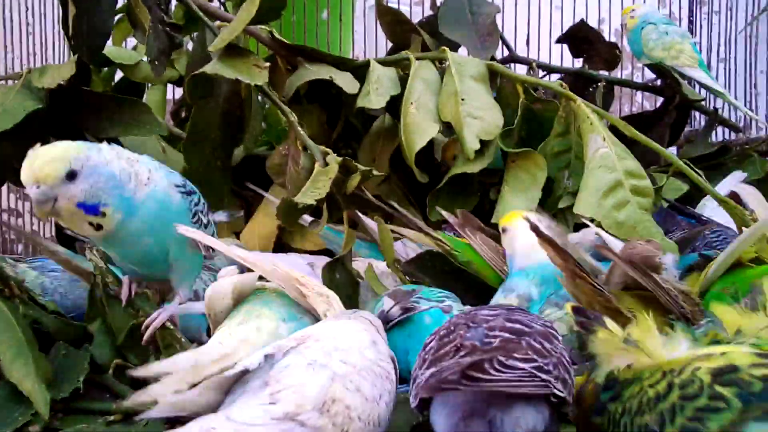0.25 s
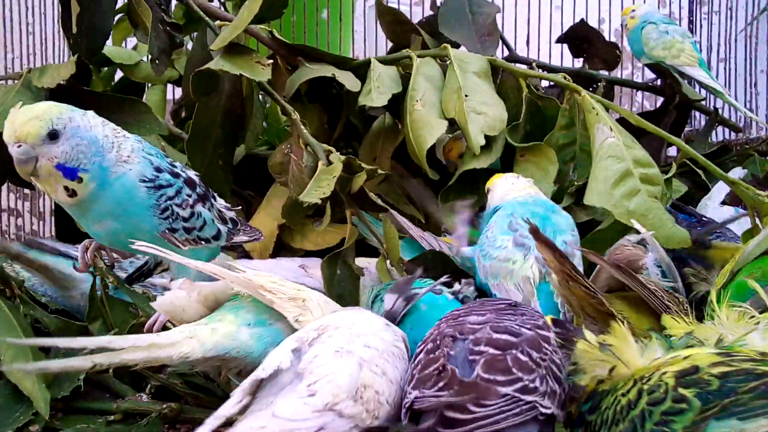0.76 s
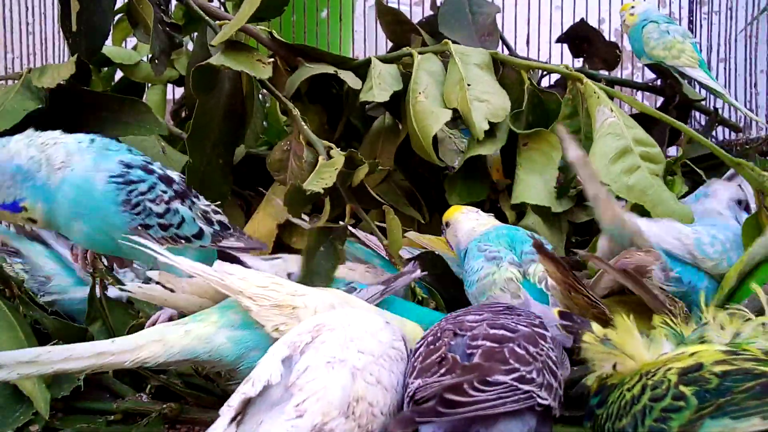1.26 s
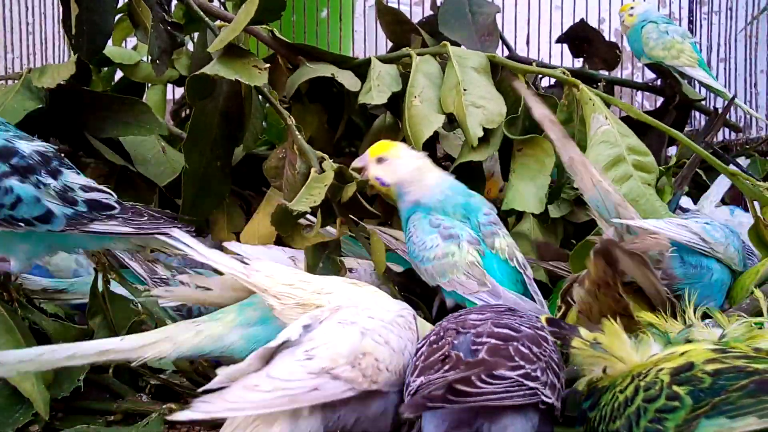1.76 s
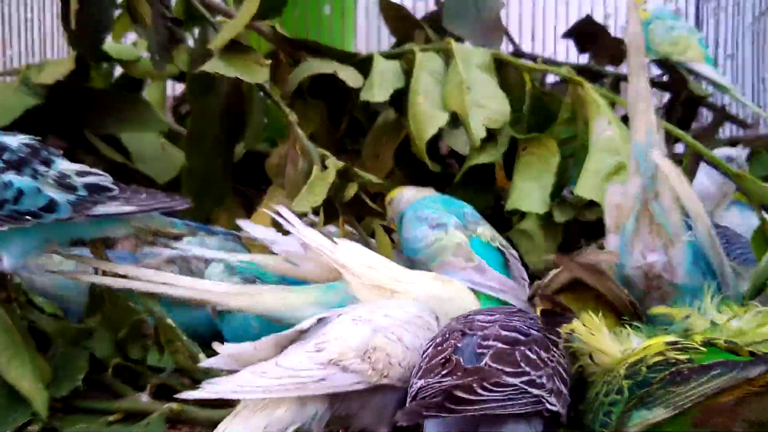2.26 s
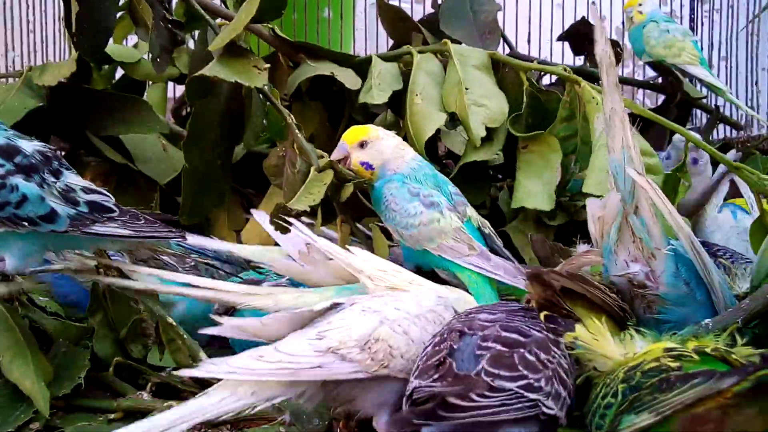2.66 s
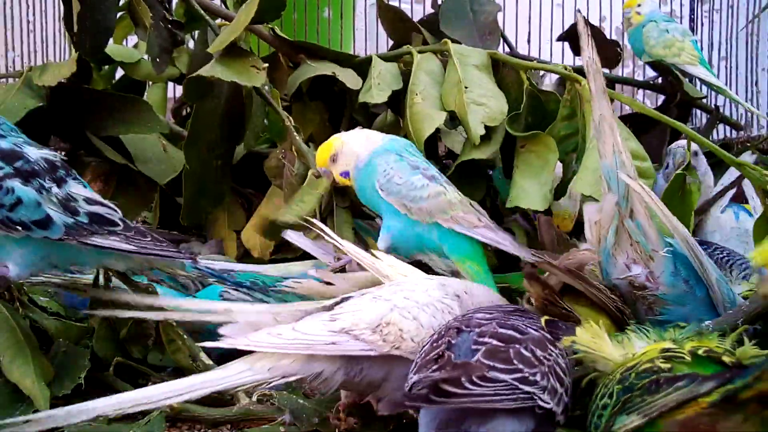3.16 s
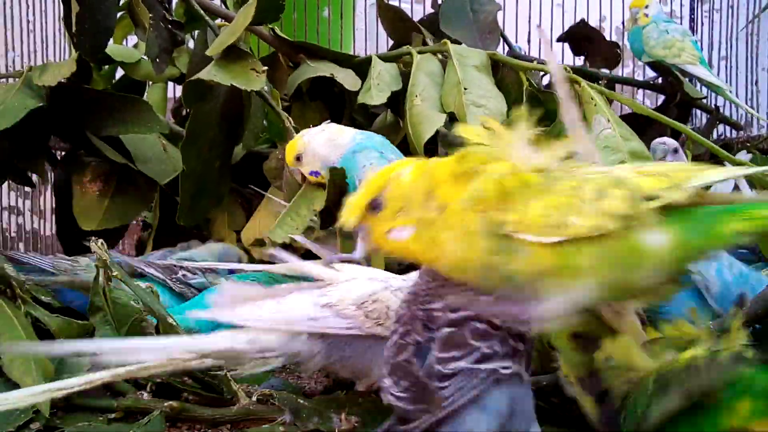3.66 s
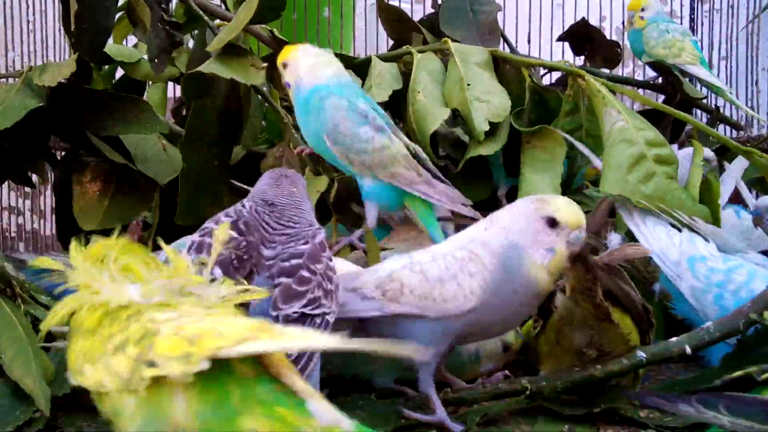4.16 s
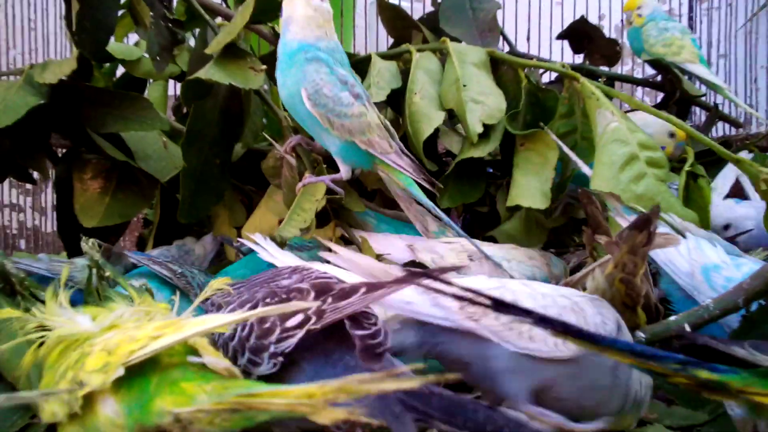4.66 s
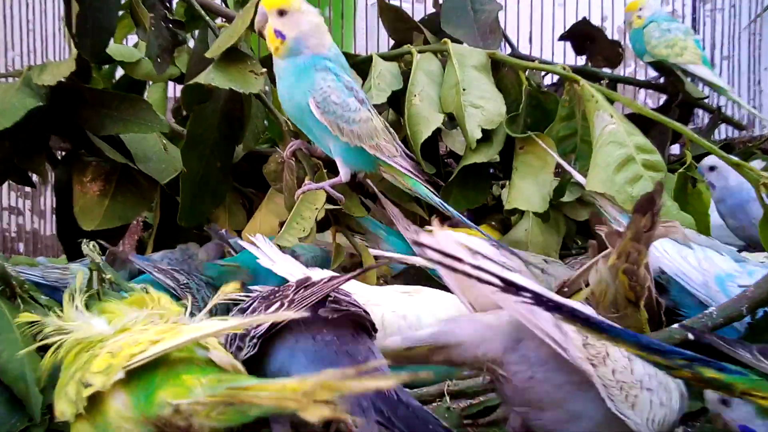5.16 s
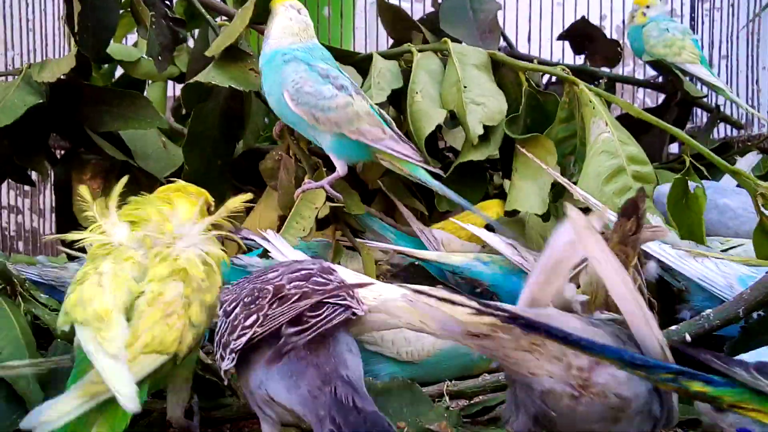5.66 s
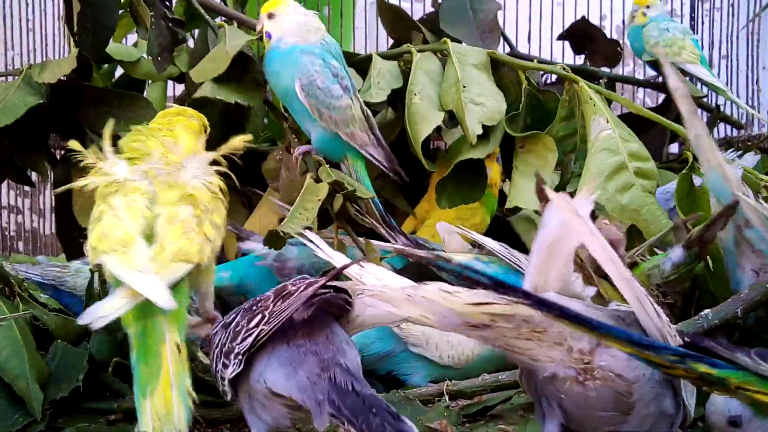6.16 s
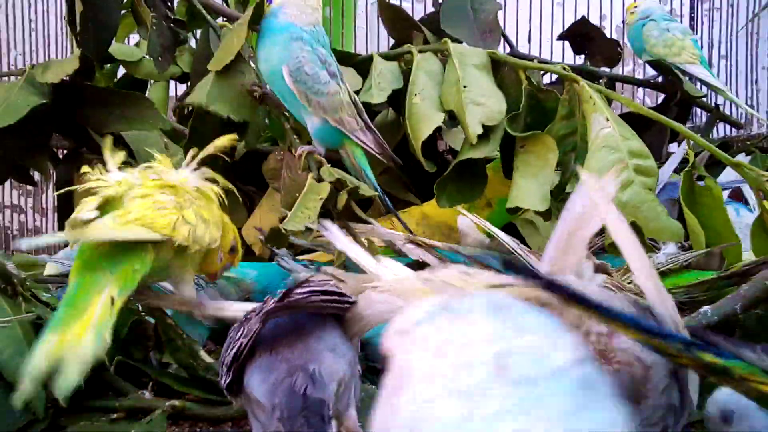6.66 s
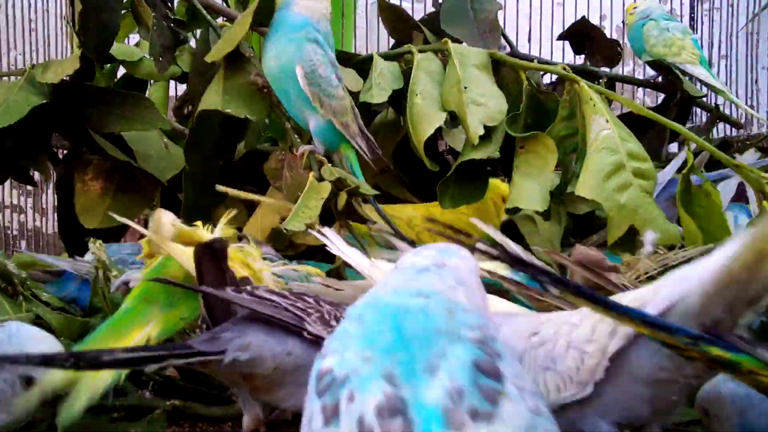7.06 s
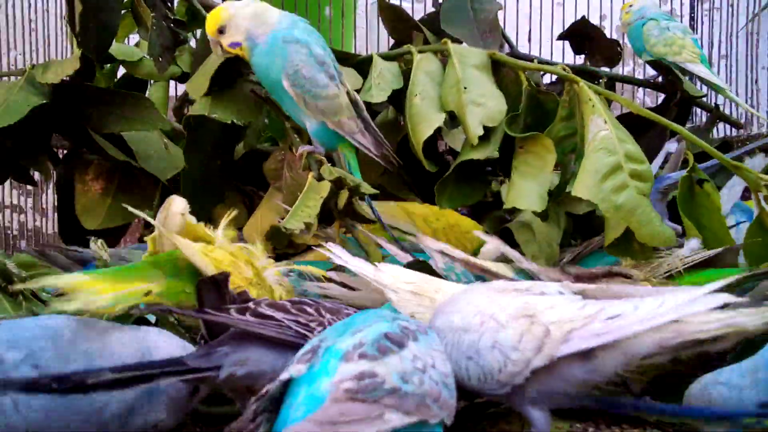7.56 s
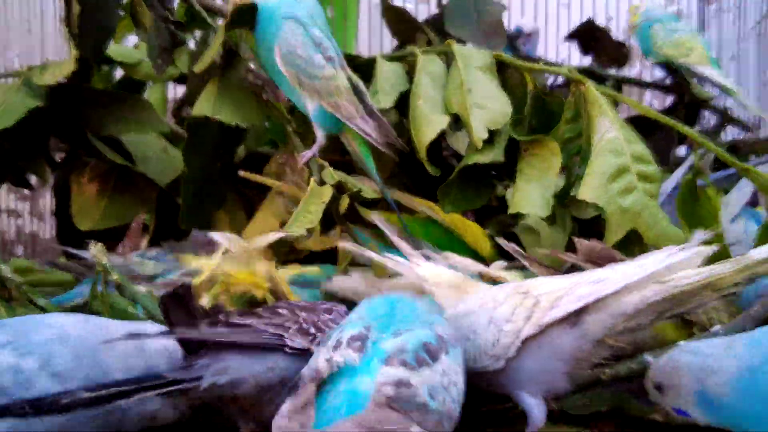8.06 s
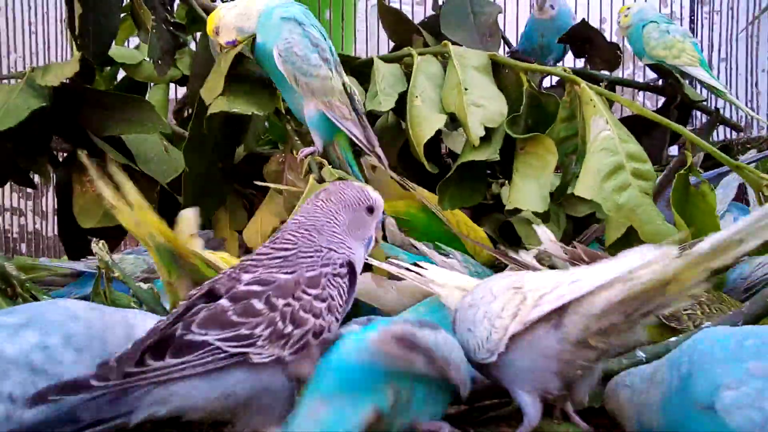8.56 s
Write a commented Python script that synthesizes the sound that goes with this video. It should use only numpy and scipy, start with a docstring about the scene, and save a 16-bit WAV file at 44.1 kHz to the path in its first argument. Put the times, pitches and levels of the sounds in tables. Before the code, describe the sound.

Budgerigars feed on leafy branches, chattering in quick bright bursts over a distant ringing flock, with dull knocks, dry rustles and a brief wing flutter.

```python
"""In an aviary, close to one microphone, a flock of budgerigars chatters while feeding on leafy branches.
Near birds chirp, warble, yip, rasp and scold over the ringing calls of birds farther off.
Voices are vibrating membranes coloured by throat and beak; scolds are shaped noise.
Beaks and feet knock on the branches as struck resonances, leaves and husks snap as bursts of noise,
a faint high crackling hiss comes and goes, and wings push air at the microphone in low swings of pressure."""
import sys
import numpy as np
from scipy import signal
from scipy.fft import rfft, irfft, next_fast_len
from scipy.io import wavfile
from scipy.ndimage import uniform_filter1d

SR = 44100
rng = np.random.default_rng(int(sys.argv[2]) if len(sys.argv) > 2 else 0)


def master_out(mix):
    """Clip the mix to full scale and print it as 16-bit PCM to the path in sys.argv[1]."""
    frames = np.transpose(np.atleast_2d(mix))
    ceiling = np.clip(frames, -1, 1)
    pcm = np.round(ceiling * 32767).astype(np.int16)
    wavfile.write(sys.argv[1], SR, pcm)


N = 389403
EDGE_HZ = 16100  # upper limit of the recorded band

# Ways to bend a note: turning point [share of the note], bend away from it [log pitch per squared share,
# negative = upward], roughness [0-1], trill depth [share of the pitch]
ARCH = (0.54, 0.817, 0.073, 0.013)
HOOP = (.46, 2.4, .08, 0)
RISE = (.75, .42, .04, 0)
SWEEP = (.85, .85, .05, 0)
CLIMB = (.12, -1.05, .05, 0)
LIFT = (0, -.47, .08, 0)
DIP = (.5, -0.913, 0.17, 0.057)
FLICK = (0, .6, .17, .03)
FALL = (0, .15, .07, 0)
LEVEL = (.5, .06, .08, 0)
BUZZ = (.45, .3, .36, .14)
# Resonances of the throat behind a wide-open beak: f/Hz, gain/dB
OPEN_BEAK = [(800, 4), (2000, 1.5), (3200, 3.5), (4300, 5), (6000, 6), (7500, 0), (9000, -34),
             (15000, -15.5)]
# Colour of the snaps and of the high crackling hiss: f/Hz, gain/dB
SNAP_COLOUR = [(900, -2.5), (4000, 1.5), (7300, 8.5), (9000, -7), (13500, -8.5), (15000, -8)]


def amp(db):
    """Decibels to gain."""
    return 10 ** (np.asarray(db) / 20)


def unit(x):
    """Scales to rms 1."""
    return x / np.sqrt(np.mean(x ** 2) + 1e-20)


def read(points, hz):
    """Reads a spectrum on a log-frequency axis."""
    f, value = np.transpose(points)
    return np.interp(np.log(hz + 1), np.log(f), value)


def colour(x, points):
    """Filters by a spectrum in dB."""
    size = next_fast_len(len(x))
    gain = amp(read(points, np.fft.rfftfreq(size, 1 / SR)))
    return irfft(rfft(x, size) * gain, size)[:len(x)]


def wander(count, rate_hz):
    """Smooth random motion of about rms 1."""
    size = next_fast_len(count + 4096)
    smoothing = np.exp(-(np.fft.rfftfreq(size, 1 / SR) / rate_hz) ** 2)
    return unit(irfft(rfft(rng.standard_normal(size)) * smoothing, size))[:count]


def ring(x, hz, width_hz):
    """A two-pole resonance."""
    return signal.lfilter(*signal.iirpeak(min(hz, SR / 2 - 1), hz / width_hz, SR), x)


def progress(length):
    """Runs from 0 to 1 over a length in seconds."""
    return np.linspace(0, 1, max(int(length * SR), 64))


def shaped(x, db, taper):
    """Fades both ends and sets the rms level."""
    return amp(db) * unit(x * signal.windows.tukey(len(x), taper))


def play(rows, source):
    """Places one sound for each row at its time."""
    mix = np.zeros(N + SR)
    for s, *rest in rows:
        sound = source(*rest)
        start = max(int(s * SR), 0)
        mix[start:start + len(sound)] += sound
    return mix[:N]


def scatter(db, spread_db, count):
    """Rows (t/s, level/dB) of small events at random moments."""
    return [(a * N / SR, db + spread_db * (2 * b - 1)) for a, b in rng.random((count, 2))]


def song(phrase, renditions):
    """Rows of notes for a learned phrase, sung faster or slower, higher or lower."""
    return [(s + start * length, share * length, bend, ratio * hz, db + accent_db)
            for s, length, hz, db in renditions
            for start, share, bend, ratio, accent_db in phrase]


def wash(db=-42, patchy_db=5.5, swell_db=1, steady_hz=220):
    """The background hiss comes and goes in patches of pitch and time, over a steadier rumble."""
    # Background noise: f/Hz, gain/dB
    air = [(20, -15), (75, 9.5), (140, -9), (230, -20), (350, -4.5), (1400, -11), (3400, -4), (4400, -7.5),
           (7200, -6.5), (9000, -31), (13500, -28.5), (15000, -24)]
    hz, _, z = signal.stft(colour(rng.standard_normal(N), air), SR, nperseg=512, noverlap=384)
    across_pitch = uniform_filter1d(rng.standard_normal(z.shape), size=14, axis=0)
    patches = unit(uniform_filter1d(across_pitch, size=26, axis=1))
    patch_gain = amp(patchy_db * patches * (hz / (hz + steady_hz))[:, None])
    hiss = signal.istft(z * patch_gain, nperseg=512, noverlap=384)[1][:N]
    return amp(db) * unit(hiss) * amp(swell_db * wander(N, 2.3))


def syrinx(hz, rough, tract, jitter=0.16, drift=.012, slope_db=0, lift_db=0, rasp_hz=900):
    """A vibrating membrane heard through the throat; when rough it jitters and doubles its period."""
    count = len(hz)
    unsteady = jitter * rough * wander(count, rasp_hz) + drift * wander(count, 240)
    phase = 2 * np.pi * np.cumsum(hz * (1 + unsteady)) / SR
    tone = 0
    for k in range(1, 5):
        harmonic_db = read(tract, k * hz) + slope_db * (k + 0.5) + lift_db * (k == 2)
        tone = tone + amp(harmonic_db) * (k * hz < EDGE_HZ) * np.sin(k * phase)
    # level by the stronger of the first two harmonics
    tone = tone / amp(np.maximum(read(tract, hz), read(tract, 2 * hz) + slope_db + lift_db))
    # alternate cycles differ in strength, which adds side tones halfway between the harmonics
    doubling = 1 + 1.34 * rough * wander(count, 127) * np.cos(phase / 2)
    flutter = np.exp(.6 * np.sqrt(abs(rough)) * np.tanh(wander(count, 300)))
    turbulence = .22 * rough * unit(colour(rng.standard_normal(count), tract))
    return (tone * doubling + turbulence) * flutter


def note(length, bend, turn_hz, db, slack_db=9, attack_s=0.0018, release_s=0.0023,
         whim=0.0228, trill_hz=140):
    """The pitch curves away from a turning point; the farther it strays, the weaker and hoarser the voice."""
    # Throat resonances: f/Hz, gain/dB
    throat = [(900, -21), (2000, 10), (3500, 15), (4600, 0.5), (6500, 5), (7800, 4.5), (9000, -69),
              (15000, -10)]
    # Low notes are richer in overtones: pitch f/Hz, lift of the second harmonic/dB
    overtones = [(1900, 7), (2500, -2)]
    u = progress(length)
    turn, curve, rough, trill = bend
    away = (u - turn) ** 2
    quiver = trill * np.sin(2 * np.pi * (trill_hz * length * u + rng.random())) + whim * wander(len(u), 74.0)
    hz = turn_hz * np.exp(quiver - curve * away)
    attack = np.minimum(u * length / attack_s, 1)
    release = np.minimum((1 - u) * length / release_s, 1)
    effort = amp(-slack_db * away)
    voice = syrinx(hz, rough * (.5 + 3 * away), throat, slope_db=-6.5, lift_db=read(overtones, hz))
    return amp(db) * unit(voice * attack * release * effort)


def among_leaves(x, count=4, strength=0.29, delay_s=.009):
    """Nearby leaves and bars return a few early echoes, so a sweeping pitch swells and fades."""
    out = np.pad(x, (0, int(delay_s * SR) + 1))
    for delay, sign in zip(rng.random(count), rng.choice([-1, 1], count)):
        start = int(delay * delay_s * SR)
        out[start:start + len(x)] += sign * strength * x
    return out


def whistle(length, bend, hz, db):
    """One note, heard through the foliage."""
    return among_leaves(note(length, bend, hz, db))


def flock(count=170, db=-54.0, spread_db=3):
    """The other birds slur short notes at random."""
    bends = [ARCH, RISE, SWEEP, DIP]
    rows = [(a * N / SR, .015 + .035 * b, bends[int(c * len(bends))], 1900 + 2000 * d,
             db + spread_db * (2 * e - 1))
            for a, b, c, d, e in rng.random((count, 5))]
    return play(rows, whistle)


def knock(db, hz=740, ring_s=0.0088, rattle=0.38):
    """A dull tap rings a branch, then a few separate ticks of twigs ring with it."""
    t = np.arange(2048) / SR
    tap = 1. * (t == 0)
    branch_hz = hz * np.exp(0.16 * rng.standard_normal())
    blow = ring(ring(tap, branch_hz, 670), hz, 2300)
    ticks = rng.standard_normal(len(t)) * (rng.random(len(t)) < 400 / SR)  # about 400 a second
    twigs = unit(ring(ring(ticks, 395, 315), hz, 2000)) * np.exp(-t / ring_s)
    band = signal.butter(3, [270, 1700], "band", fs=SR)
    return amp(db) * signal.lfilter(*band, blow / abs(blow).max() + rattle * twigs)


def scold(length, db, flutter_db=2.5, flutter_hz=220):
    """A hoarse, fluttering screech of coloured noise that swells and fades."""
    # Colour of the screech: f/Hz, gain/dB
    screech_colour = [(1200, -66), (3000, -7.5), (4600, -4.5), (6700, 5), (7500, -5), (8800, -23.5),
                      (15000, -30)]
    u = progress(length)
    flutter = amp(flutter_db * wander(len(u), flutter_hz))
    screech = colour(rng.standard_normal(len(u)), screech_colour) * flutter
    return amp(db) * unit(screech * np.sqrt(abs(np.sin(np.pi * u))))


def peeps():
    """Rows of notes for the peep: an arch, a fall and a low dip."""
    # Learned phrase: start and length [shares of the phrase], bend, pitch [ratio], accent/dB
    phrase = [(0, 0.24, ARCH, .92, 0), (.27, 0.32, FALL, 1.07, 2.5), (.62, .38, DIP, .52, -8)]
    # Each time it is sung: t/s, length/s, f/Hz, level/dB
    renditions = [(0.184, 0.083, 3380, -33), (0.255, .08, 3630, -33), (.373, 0.088, 3600, -36),
                  (.503, .078, 3450, -33), (2.272, 0.11, 3446, -34.5)]
    return song(phrase, renditions)


def draught(length, db, hz=85, width_hz=70):
    """Stirred air buffets the microphone in a low swell."""
    return shaped(ring(wander(len(progress(length)), 135), hz, width_hz), db, 0.62)


def snap(db, crack_s=0.011, crumble=0.13):
    """A dry crack with a trail of tiny fractures."""
    t = np.arange(1024) / SR
    grains = rng.standard_normal(len(t))
    fractures = crumble * grains ** 3 / 2 * np.exp(-t / 0.065)
    crack = colour(grains * np.exp(-t / crack_s) + fractures, SNAP_COLOUR)
    return 2 * amp(db) * crack / abs(crack).max()


def jostling(db=-36, spread_db=8, busiest_s=5.6, count=150):
    """Rows (t/s, level/dB) of small crackles, thickest while the birds crowd over the leaves."""
    times = rng.triangular(0, min(busiest_s, N / SR), N / SR, count)
    return list(zip(times, db + spread_db * rng.uniform(-2.0, 1, count)))


def yip(length, top_hz, db, bright_db, strain=0.23, crest_s=.019, sweep=0.97, sag_per_s=1.52):
    """The pitch shoots up over an octave, then sags; bright_db lifts or cuts the second harmonic."""
    past = progress(length) * length - crest_s
    hz = top_hz * np.exp(-np.where(past < 0, sweep * (past / crest_s) ** 2, sag_per_s * past))
    voice = syrinx(hz, strain, OPEN_BEAK, drift=strain / 10, lift_db=bright_db)
    return among_leaves(shaped(voice, db, 0.64))


def warbles():
    """Rows of notes for the warble: six quick notes leaping up and down."""
    # Learned phrase: start and length [shares of the phrase], bend, pitch [ratio], accent/dB
    phrase = [(0, .13, FLICK, 1.42, 0.5), (.18, .2, ARCH, 1.12, 2.5), (.37, 0.12, LEVEL, .9, -2.3),
              (.47, .13, DIP, 1.03, 1.4), (.59, .08, FLICK, 1.3, 0), (.68, .33, RISE, 1, 1.7)]
    # Each time it is sung: t/s, length/s, f/Hz, level/dB
    renditions = [(1.067, .13, 2860, -36.5), (2.075, .12, 2967, -29), (3.115, 0.15, 2795, -36),
                  (6.16, .13, 2820, -28), (7.2, .137, 2757, -28.5), (8.218, 0.14, 2863, -29.5)]
    return song(phrase, renditions)


def yip_runs(length=0.023, top_hz=2750, strain=0.019, bright_db=-1):
    """Birds rattle off short, relaxed yips at an even pace."""
    # Quick runs of soft yips: start t/s, end t/s, spacing/s, level/dB
    runs = [(1.364, 1.54, 0.071, -37.5), (3.406, 3.498, 0.066, -33.5), (5.075, 5.2, .057, -38.5),
            (5.278, 5.7, 0.058, -41)]
    rows = [(s, length, top_hz * rng.uniform(0.85, 1.2), db + 2 * rng.standard_normal(), bright_db, strain)
            for start, end, step, db in runs for s in np.arange(start, end, step)]
    return play(rows, yip)


def chirps():
    """Each chirp opens with a downward flick from its own height, then steps up, buzzes and sweeps up again."""
    # Learned phrase: start and length [shares of the phrase], bend, pitch [ratio], accent/dB
    phrase = [(.25, 0.11, LIFT, .68, -4), (.355, .105, RISE, 1.13, 8), (.48, .2, BUZZ, 1.08, 2.5),
              (.68, .13, LIFT, .58, -4), (.78, .22, RISE, .99, 5.5)]
    # Each time it is sung: t/s, length/s, f/Hz, level/dB, opening f/Hz
    renditions = [(1.53, 0.11, 3150, -28, 4450), (4.107, 0.1, 3040, -26.5, 4610),
                  (7.818, 0.11, 3133, -26.5, 5460), (8.006, .097, 3100, -26.5, 4060),
                  (8.725, 0.11, 3214, -26.5, 5070)]
    flicks = [(s, .17 * length, FLICK, opening_hz, db + 5) for s, length, _, db, opening_hz in renditions]
    return flicks + song(phrase, [row[:-1] for row in renditions])


def rasp(length, hz, db, pulse_hz=215, width_share=1.0, slur_hz=55):
    """Low, mostly upward slurs run together, chopped some 215 times a second; the throat lifts harmonic 2."""
    u = progress(length)
    cycle = np.cumsum(pulse_hz * np.exp(wander(len(u), 160) / 10)) / SR % 1
    chop = .5 + np.exp(-cycle / .4)
    slur = u * max(1, round(length * slur_hz)) % 1
    voice = syrinx(hz / 2 * np.exp(-(slur - .6) ** 2), .42, OPEN_BEAK, jitter=.13, lift_db=4)
    squawk = ring(np.tanh(unit(voice * chop) / 2), hz, width_share * hz)
    return among_leaves(shaped(squawk, db, 0.93))


def crackling_hiss(length, db):
    """Clumps of tiny high crackles."""
    count = len(progress(length))
    crackles = rng.standard_normal(count) ** 3 * np.exp(wander(count, 60) / 2)
    return shaped(colour(crackles, SNAP_COLOUR), db, .5)


def far_whistle(length, hz, db):
    """A nearly level note, smeared by many reflections."""
    u = progress(length)
    phase = 2 * np.pi * np.cumsum(hz * (1 + 0.058 * (np.sin(np.pi * u) - .5))) / SR
    smeared = wander(len(u), 470) * np.cos(phase) + wander(len(u), 190) * np.sin(phase)
    return shaped(smeared, db, 0.092)


def wing(db, hz=100, swing_s=0.005, eddy=0.076, eddy_s=0.014):
    """A downstroke: pressure dips, pushes and rebounds, then eddies; harder strokes swing more sharply."""
    t = np.arange(SR // 10) / SR
    eddies = unit(ring(rng.standard_normal(len(t)), hz, hz)) * t / eddy_s * np.exp(1 - t / eddy_s)
    # the swing is centred 20 ms in, and squeezed in time by the strength of the stroke
    t = (t - .02) * amp(.3 * (db + 18))
    push = np.sin(2 * np.pi * hz * t) * np.exp(-(t / swing_s) ** 2)
    return 1.38 * amp(db) * signal.lfilter(*signal.butter(2, 55, "high", fs=SR), push + eddy * eddies)


def swoops():
    """Rows of notes for the swoop: a low climb running into a steep hoop."""
    # Learned phrase: start and length [shares of the phrase], bend, pitch [ratio], accent/dB
    phrase = [(0, 0.63, CLIMB, .67, -8.5), (.45, .55, HOOP, 0.98, 1)]
    # Each time it is sung: t/s, length/s, f/Hz, level/dB
    renditions = [(5.991, 0.1, 2450, -32.5), (7.012, 0.12, 2716, -29.5), (8.05, .11, 2490, -32)]
    return song(phrase, renditions)


def aviary(x):
    """Sparse reflections, each band dying at its own speed."""
    # Reverberation: f/Hz, t60/s
    decay = [(400, 0.062), (3000, 0.44), (9000, 0.43)]
    taps = rng.standard_normal(SR) * (rng.random(SR) < .06) * (np.arange(SR) > 200)
    hz, t, z = signal.stft(taps, SR, nperseg=256)
    fading = amp(-60 * t / read(decay, hz)[:, None])
    tail = signal.istft(z * fading, SR, nperseg=256)[1]
    return signal.fftconvolve(x, tail / np.linalg.norm(tail))[:N]


def scene():
    """Near birds, the flock behind them, feeding noises and the wash of the aviary."""
    # Hoarse high scolding: t/s, length/s, level/dB
    scoldings = [(.02, 0.17, -34), (.7, .13, -38), (.92, 0.5, -40.5), (2.66, .12, -38), (3.05, 0.14, -37.5),
                 (5.92, 0.45, -43.5), (8.45, 0.16, -33)]
    # Single notes: t/s, length/s, bend, f/Hz at the turning point, level/dB
    single_notes = [(0.143, 0.029, LEVEL, 3680, -35), (0.943, 0.014, SWEEP, 3040, -32.5),
                    (1.788, 0.053, LEVEL, 4320, -36), (1.826, 0.037, DIP, 3232, -25),
                    (1.851, 0.022, SWEEP, 4920, -28.5), (2.017, 0.051, DIP, 3140, -30.5),
                    (2.076, 0.0092, FLICK, 5540, -26.5), (2.363, .036, ARCH, 2775, -33.5),
                    (3.014, .029, ARCH, 3230, -36), (3.092, 0.068, RISE, 2880, -33.5),
                    (3.258, 0.036, LEVEL, 3774, -24), (3.433, 0.0364, BUZZ, 4250, -28.5),
                    (3.52, 0.023, FLICK, 5490, -22.5), (4.782, 0.022, DIP, 3720, -23),
                    (4.801, 0.027, RISE, 3546, -22.5), (4.838, 0.026, LEVEL, 3876, -20),
                    (4.878, 0.0186, LEVEL, 3040, -22), (4.913, .036, RISE, 3270, -23),
                    (7.237, 0.037, BUZZ, 2700, -29.5), (8.438, 0.033, FLICK, 4590, -31),
                    (8.469, 0.025, RISE, 2820, -25), (8.488, 0.019, LEVEL, 3310, -22),
                    (8.508, 0.016, LEVEL, 2674, -24), (8.529, 0.041, RISE, 3030, -22)]
    # Air stirred by passing birds: t/s, length/s, level/dB
    stirred_air = [(.22, 0.39, -43), (2.13, 0.19, -45), (3.22, 0.095, -41)]
    # Knocks on the branches: t/s, level/dB ahead of the branch's band filter
    branch_knocks = [(.495, -19), (.973, -25), (2.817, -20), (2.911, -23.5), (4.441, -21), (6.063, -24),
                     (6.896, -23.5), (6.998, -25), (7.095, -24), (7.39, -25), (8.186, -22)]
    # Upswept notes, beak wide open: t/s, length/s, top f/Hz, level/dB, lift of the second harmonic/dB
    upswept = [(1.021, 0.035, 3030, -29.5, -0.5), (2.083, 0.025, 2930, -24, 12),
               (3.602, 0.048, 3010, -24, 1.5), (3.666, .054, 3076, -23, -0.5),
               (3.752, 0.03, 3070, -21, 1.5), (3.813, 0.025, 2720, -25, 3), (3.9, 0.042, 2830, -30.5, -12),
               (4.226, 0.046, 3336, -22.5, 23), (4.286, 0.037, 2326, -32, 5.5),
               (4.479, 0.042, 2734, -24.5, 8.5), (4.543, 0.046, 3120, -22.5, 13),
               (6.792, 0.023, 2805, -26.5, 0), (6.857, .024, 2750, -29, -6), (7.163, 0.036, 3150, -28, -6),
               (7.589, 0.022, 2635, -26.5, -0.5)]
    # Snaps of leaves and husks: t/s, level/dB (snap() peaks 6 dB above it)
    leaf_snaps = [(1.7344, -27), (5.5616, -23), (6.7144, -25.5)]
    # Buzzing squawks: t/s, length/s, throat resonance f/Hz, level/dB
    squawks = [(3.285, 0.059, 4050, -25.5), (3.53, 0.089, 4210, -26), (3.985, 0.027, 3356, -31),
               (4.665, 0.027, 4250, -31), (4.862, 0.028, 4230, -30), (4.98, 0.0274, 1900, -33),
               (5.03, 0.0237, 2080, -35), (5.255, .028, 1954, -34), (5.556, .014, 3980, -27),
               (6.3, 0.025, 2924, -26)]
    # Faint high crackling hiss: t/s, length/s, level/dB
    faint_hiss = [(3.45, 0.67, -44), (4.94, .17, -44), (5.825, 0.058, -32.5)]
    # Long whistles of distant birds: t/s, length/s, f/Hz, level/dB ahead of the gain on the birds behind
    distant = [(3.76, 0.28, 3193, -43.5), (5.17, 0.21, 3135, -45.5), (5.62, 0.36, 3340, -48.5),
               (6.47, 0.42, 3220, -46.5), (7.51, 0.21, 3090, -45.5), (7.67, 0.1, 4770, -43)]
    # Wing beats: t/s at the middle of the swing, stroke level/dB
    wing_beats = [(4.918, -14), (4.973, -21), (5.033, -14), (5.075, -22), (5.103, -23), (5.162, -25.5)]

    near = play(chirps() + warbles() + swoops() + peeps() + single_notes, whistle)
    near += play(upswept, yip) + yip_runs()
    near += play(squawks, rasp) + play(scoldings, scold)
    behind = flock() + play(distant, far_whistle)
    knocks = play([*branch_knocks, *scatter(-33.0, 7.9, count=340)], knock)
    crackles = play([*leaf_snaps, *jostling()], snap) + play(faint_hiss, crackling_hiss)
    wings = play([(s - .02, db) for s, db in wing_beats], wing) + play(stirred_air, draught)
    echo = aviary(amp(-14.5) * near + amp(1.0) * behind)
    return (near + amp(4) * behind + knocks + crackles + wings + wash() + echo)[None]


def record(dry, ceiling=0.38):
    """The recorder rounds off the highest peaks, then limits the band."""
    rounded = ceiling * dry / (ceiling ** 4 + dry ** 4) ** .25
    lowpass = signal.firwin(511, EDGE_HZ, window=("kaiser", 9), fs=SR)
    return signal.oaconvolve(rounded, lowpass[None], "same")


dry = scene()
out = record(dry)
master_out(out)
```